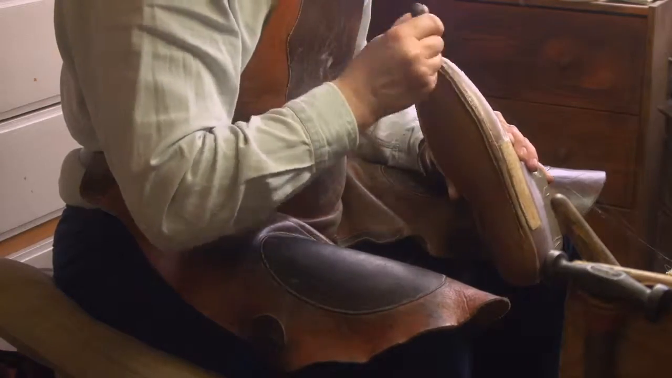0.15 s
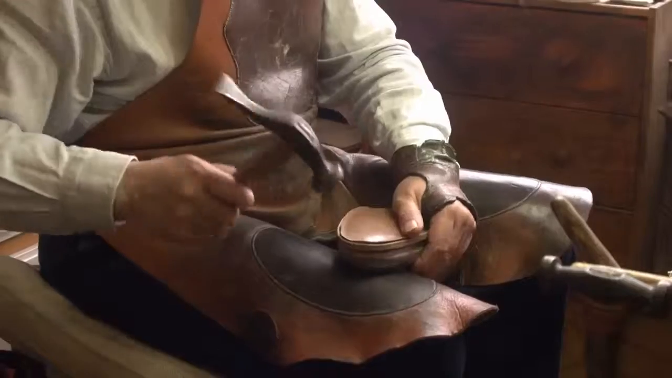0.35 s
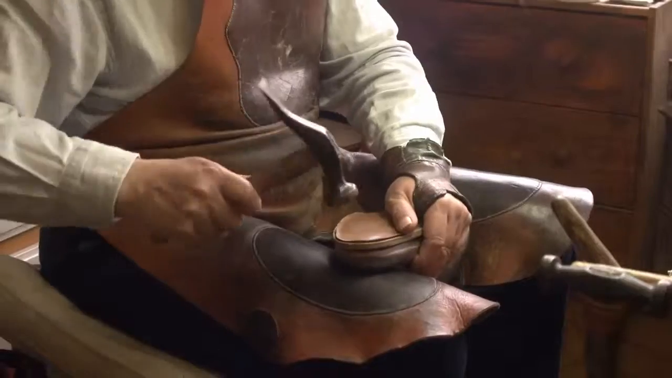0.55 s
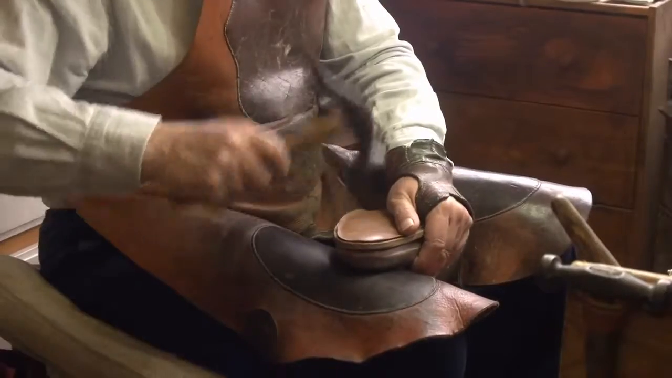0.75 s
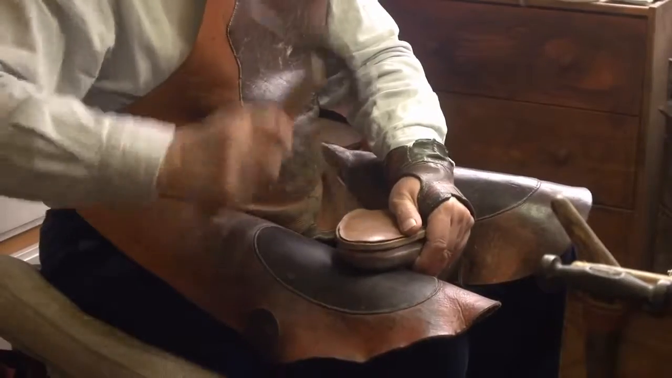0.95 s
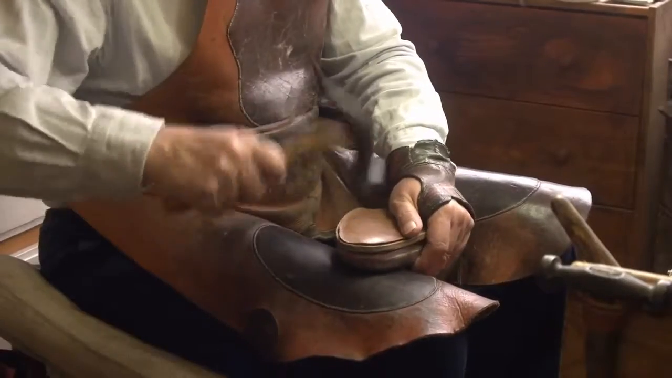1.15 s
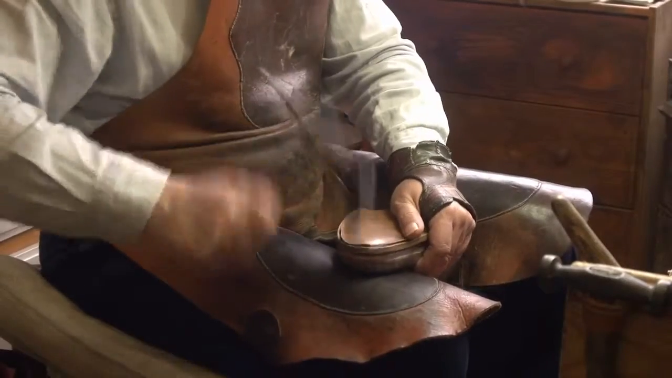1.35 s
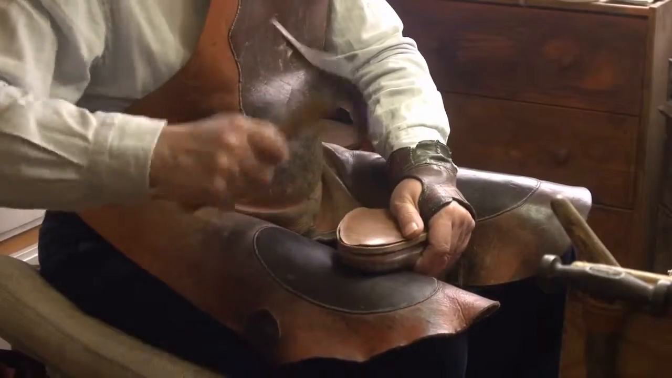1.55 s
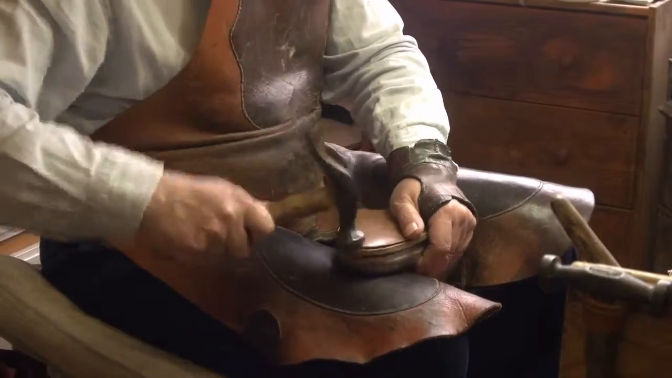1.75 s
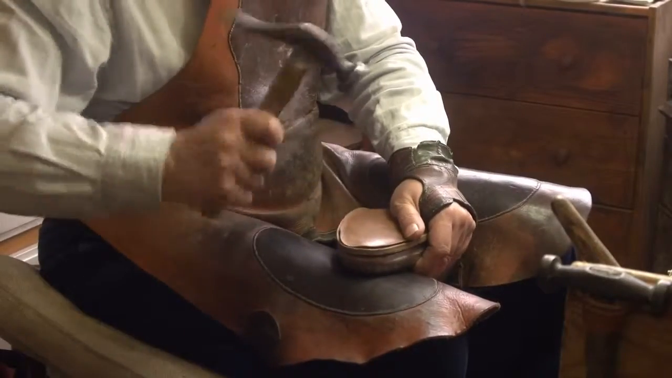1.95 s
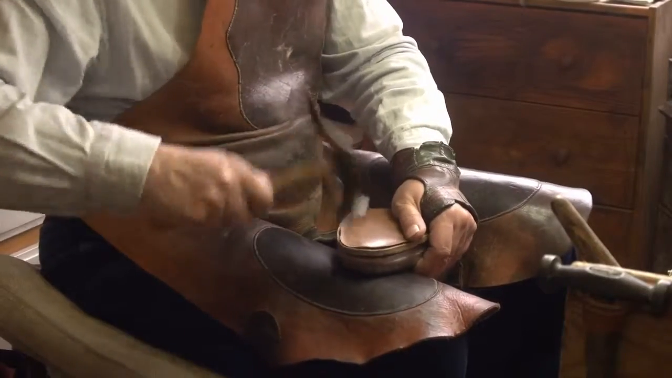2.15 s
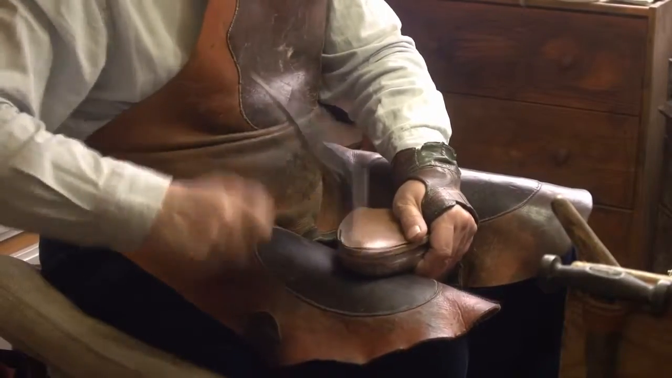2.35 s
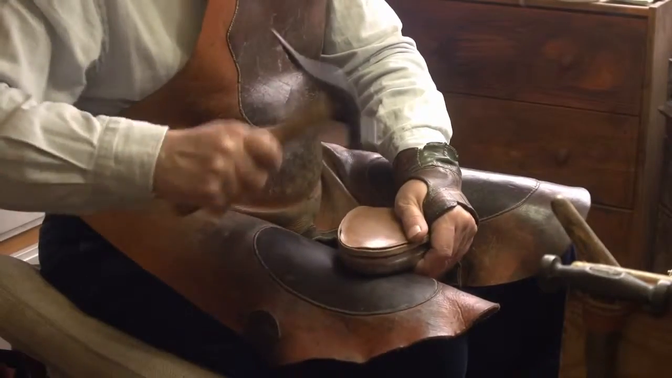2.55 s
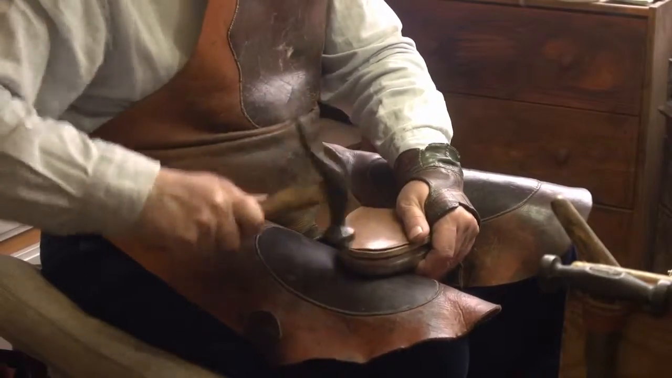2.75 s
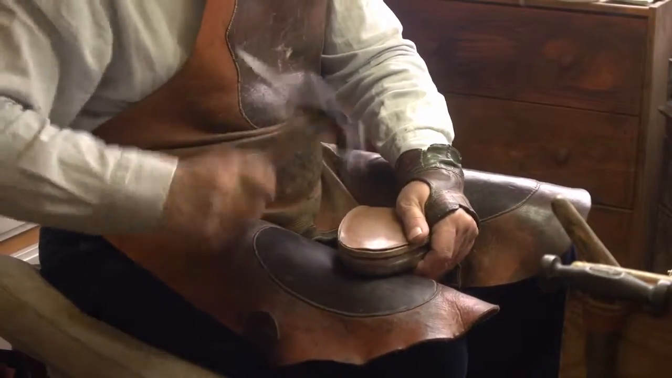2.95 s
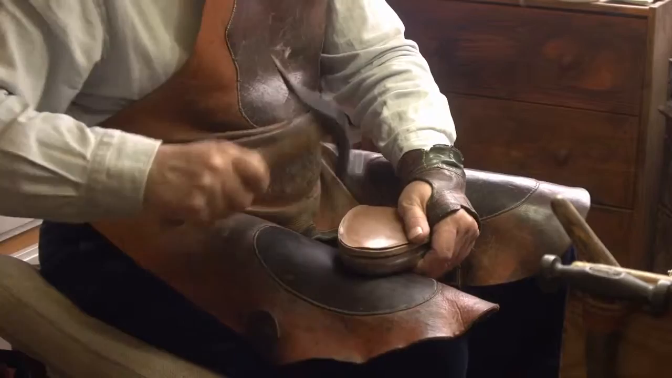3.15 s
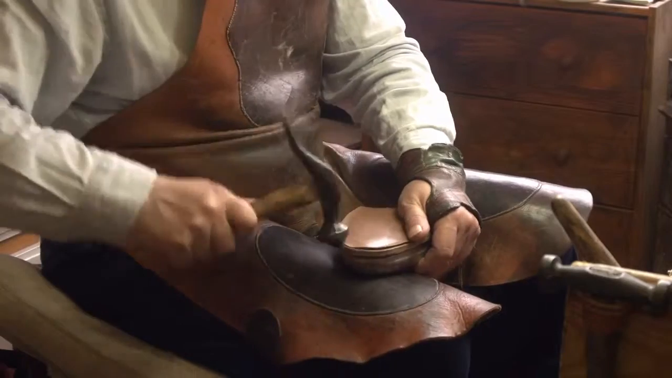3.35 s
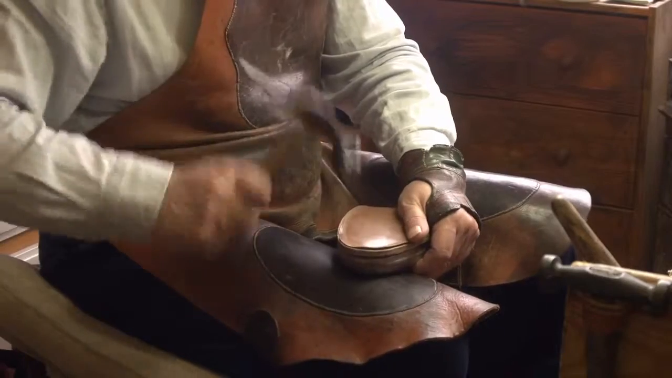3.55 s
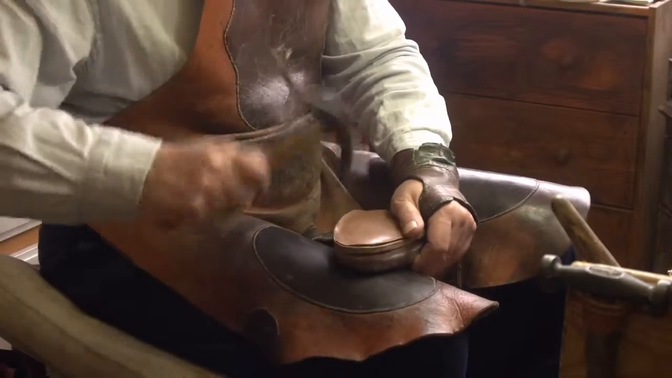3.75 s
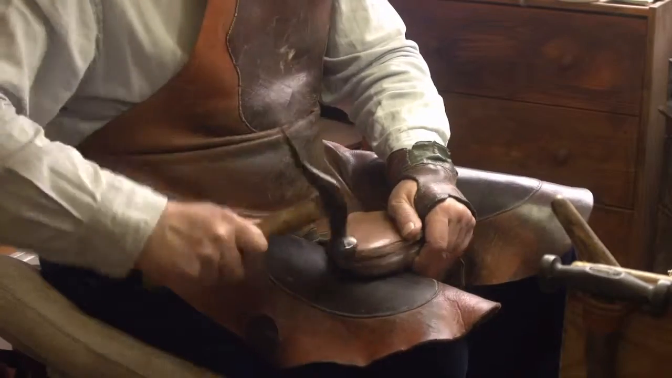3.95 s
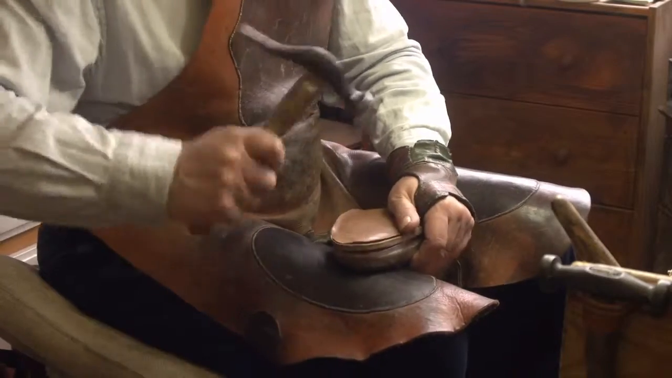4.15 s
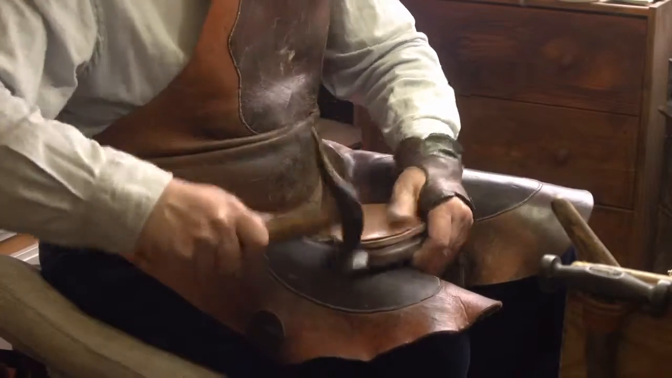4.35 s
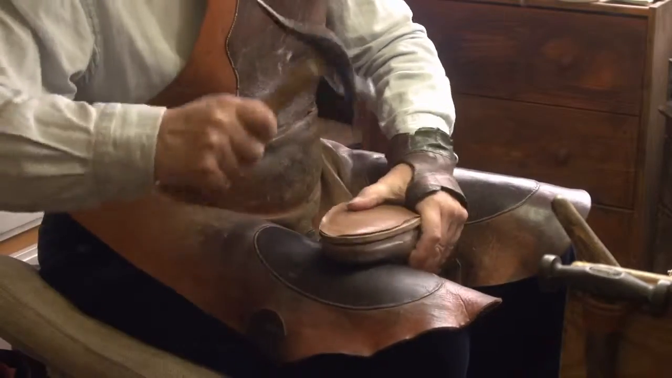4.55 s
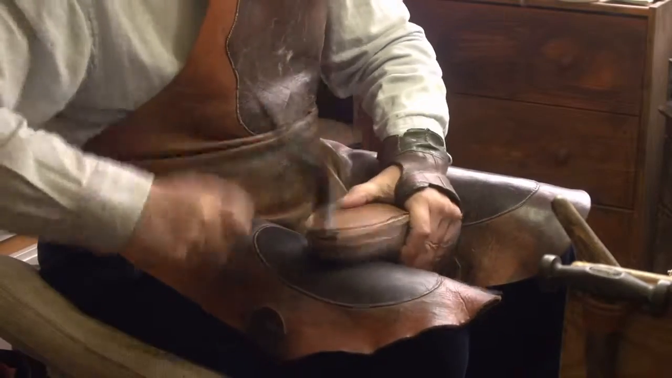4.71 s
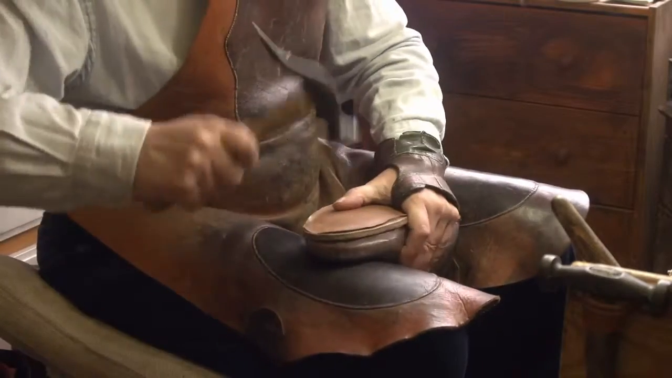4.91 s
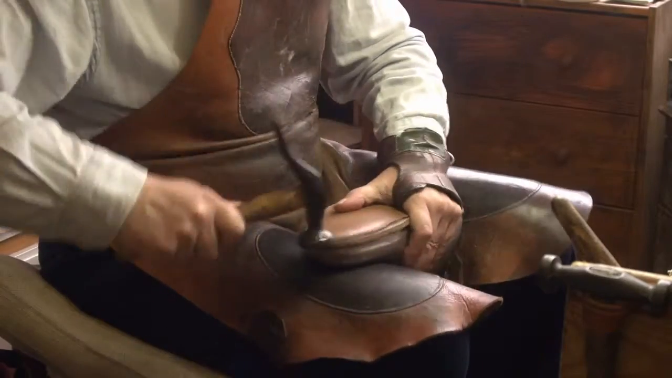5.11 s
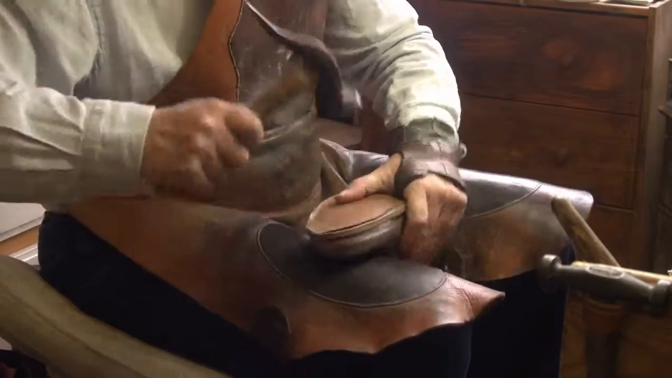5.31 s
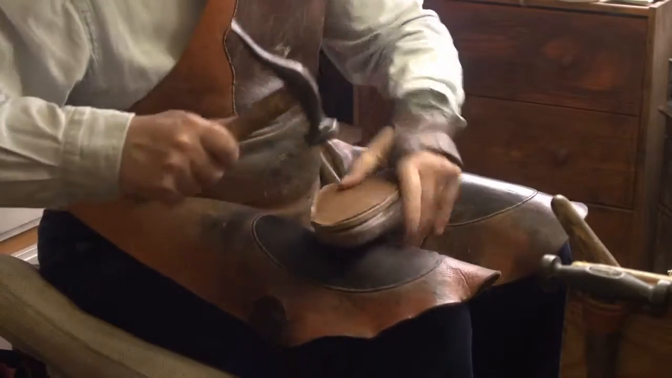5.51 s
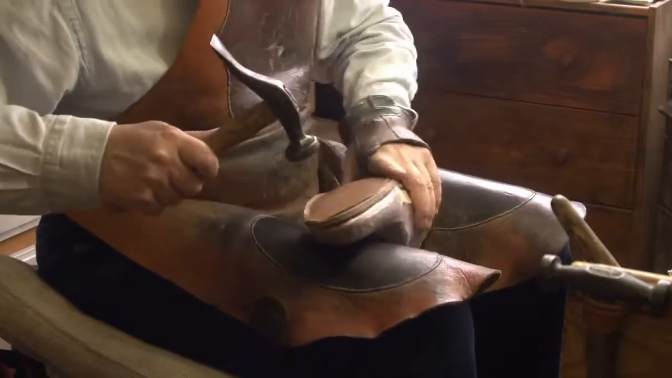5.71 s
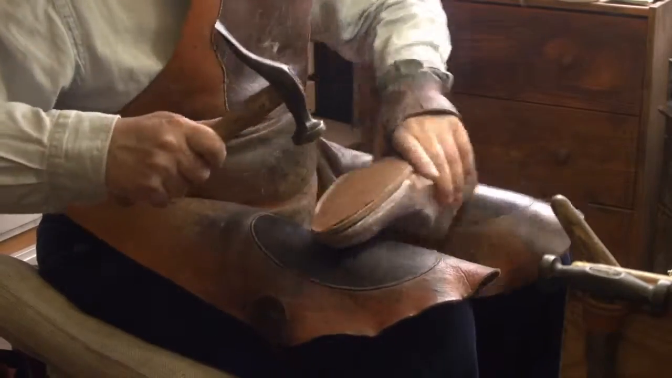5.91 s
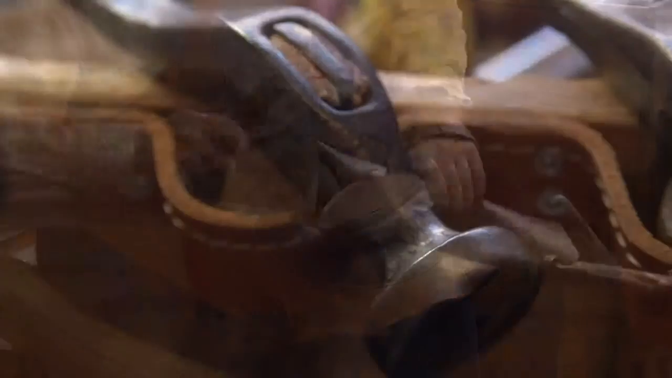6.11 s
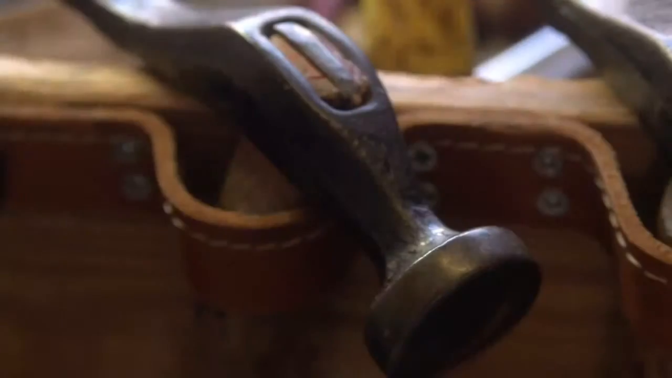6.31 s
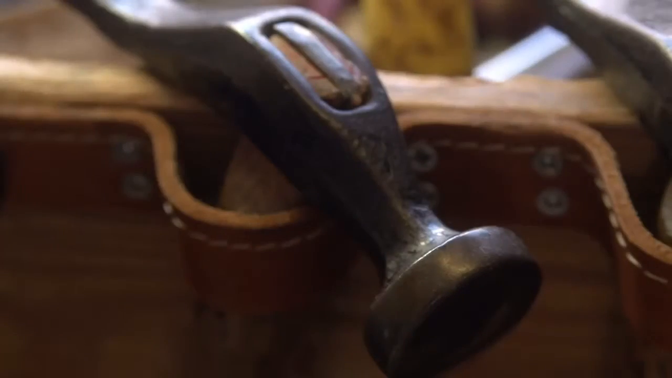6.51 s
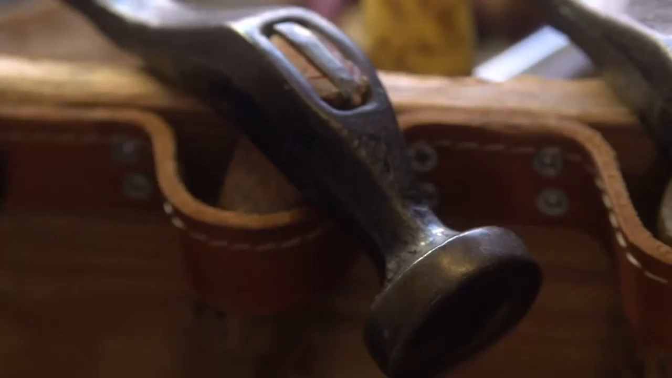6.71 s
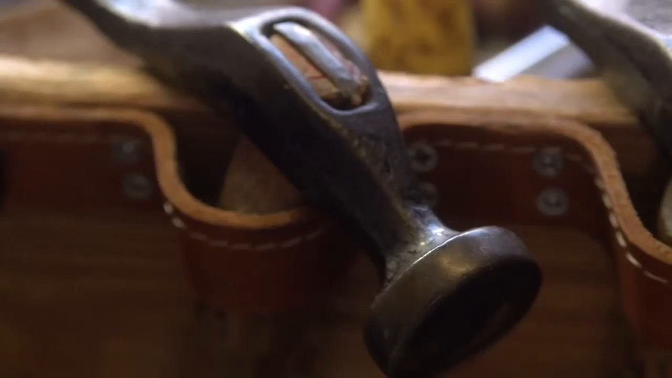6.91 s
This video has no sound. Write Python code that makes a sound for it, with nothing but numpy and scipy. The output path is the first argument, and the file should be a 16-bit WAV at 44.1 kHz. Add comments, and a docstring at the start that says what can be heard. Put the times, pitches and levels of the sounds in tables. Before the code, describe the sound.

Quiet room air and low mains hum lie under a small, live workshop. At 0.1-0.3 s a shoe bumps softly and scuffs on a leather apron, and a thin high whine swells faintly until about 1.4 s. From 1.06 s a steel hammer strikes the leather sole on its last, about three blows a second: sharp crack, hollow mid-pitched knock, low lap thud, short dense echo and a very faint metallic ring. Blows soften around 3.3-3.6 s, then strengthen until 4.3 s. A short rub, then a lighter blow at 4.77 and the hardest at 5.11. In the pause, 5.3-6.0 s, leather slides, creaks and squeaks briefly, with small bumps. Three duller, heavier blows follow at 6.3, 6.64 and 6.95 s, the last near the end. Close microphone, right channel only, left almost silent; loud peaks are squashed.

```python
"""Mains hum and room air lie under a small live workshop; a shoe bumps and scuffs on an apron, a thin whine swells.
From about one second a cobbler hammers a leather sole on a last in his lap, about three blows a second.
In a pause past five seconds he turns the shoe, which slides and squeaks on the leather; then the last blows fall.
Blows are noise cracks, ringing sines and wall echoes; rubbing is shaped noise, squeaks are unsteady sines.
One microphone feeds the right channel, with only faint crosstalk on the left; its input flattens the peaks."""
import sys
import numpy as np
from scipy import signal
from scipy.fft import rfft, irfft, next_fast_len
from scipy.io import wavfile
from scipy.ndimage import map_coordinates

SR = 44100
rng = np.random.default_rng(int(sys.argv[2]) if len(sys.argv) > 2 else 0)


def transcribe(signal):
    """Save signal, clipped to [-1, 1], as a 16-bit WAV file at the path in sys.argv[1]."""
    frames = np.atleast_2d(signal).T
    limited = np.clip(frames, -1, 1)
    pcm = np.round(limited * 32767).astype(np.int16)
    wavfile.write(sys.argv[1], SR, pcm)


N = 307377  # length in samples


def amp(db):
    """Decibels to gain."""
    return 10 ** (np.asarray(db) / 20)


def unit(x):
    """Scale to rms 1."""
    return x / np.sqrt(np.mean(x ** 2) + 1e-20)


def along(points, hz):
    """Interpolate (Hz, value) points on a log frequency axis."""
    point_hz, values = np.transpose(points)
    return np.interp(np.log(hz + 1), np.log(point_hz + 1), values)


def filtered(x, gain_at):
    """Filter x by a gain that depends on frequency, without phase shift."""
    size = next_fast_len(len(x) + SR // 10)  # spare room keeps the end from wrapping round
    hz = np.fft.rfftfreq(size, 1 / SR)
    return irfft(rfft(x, size) * gain_at(hz), size)[:len(x)]


def noise(spectrum, size):
    """Noise of rms 1 with the given colour and random phases."""
    hz = np.fft.rfftfreq(size, 1 / SR)
    phases = np.exp(2j * np.pi * rng.random(len(hz)))
    return unit(irfft(amp(along(spectrum, hz)) * phases, size))


def wobble(rate):
    """A smooth random curve through `rate` random knots a second."""
    knots = rng.standard_normal(int(N * rate / SR) + 4)
    return map_coordinates(knots, [np.arange(N) * rate / SR])


def sine(hz, t):
    """A sine at a random starting phase."""
    return np.sin(2 * np.pi * (hz * t + rng.random()))


# drop in dB one rise or fall time from the peak; roundness of the peak
SWELL_DB, SWELL_CURVE = 10, 1.87


def swells(rows, t):
    """Gain of motions that each gather, peak and come to rest; overlapping ones add in power."""
    power = np.zeros(len(t))
    for s, db, rise_s, fall_s in rows:
        away = np.maximum((s - t) / rise_s, (t - s) / fall_s)  # distance from the peak
        power += amp(db - SWELL_DB * np.abs(away) ** SWELL_CURVE) ** 2
    return np.sqrt(power)


# Colour of the room air. Each row: frequency in Hz, relative level in dB per Hz.
AIR_COLOUR = [(20, -12), (35, -4), (70, -11), (150, -13), (230, -13), (330, -17), (450, -17.5),
              (650, -22.5), (1100, -25), (1700, -30.5), (2200, -38), (2900, -39), (5000, -46),
              (16000, -52.5)]
# Tones of the mains hum. Each row: frequency in Hz, level in dB before the hum's own gain.
HUM_TONES = [(49.5, -54), (99.9, -82), (400, -71), (1480, -78)]
# Swells of the thin whine. Each row: loudest moment in seconds, peak in dB, rise in seconds, fall in seconds.
WHINE_SWELLS = [(.36, -62.5, 0.12, 0.22), (.98, -62, 0.1, .15), (1.33, -65, .1, .1)]


def background(air_db, hum_db, whine_hz):
    """Room air is steady coloured noise; hum is a set of steady sines; the whine is one sine that swells."""
    t = np.arange(N) / SR
    hum = sum(amp(db + hum_db) * sine(hz, t) for hz, db in HUM_TONES)
    whine = swells(WHINE_SWELLS, t) * sine(whine_hz, t)
    air = amp(air_db) * noise(AIR_COLOUR, size=N)
    return hum + whine + air


# Hands and shoe bump and scuff on the apron.
# Each row: start in seconds, level in dB, centre frequency in Hz, time to fall 60 dB in seconds.
APRON_CONTACTS = [(0.124, -39, 95, 0.39), (0.193, -37, 90, 0.11), (.23, -52, 1730, 0.42),
                  (.805, -60, 5000, .12), (5.59, -41, 780, 0.19), (5.705, -41, 1280, 0.1),
                  (5.752, -46.5, 1500, 0.21), (6.014, -37, 75, 0.19)]


def handling(rise_s):
    """Soft contacts: puffs of noise around one pitch that start quickly and die away."""
    t = np.arange(SR // 2) / SR
    out = np.zeros(N + SR)
    for s, db, hz, t60 in APRON_CONTACTS:
        colour = [(hz / 8, -40), (hz / 2, -6), (hz, 0), (hz * 2, -12), (hz * 10, -60), (hz * 100, -120)]
        envelope = amp(db - 60 * t / t60) * (1 - np.exp(-t / rise_s))
        out[round(s * SR):][:len(t)] += envelope * noise(colour, size=len(t))
    return out[:N]


# Colour of leather rubbing on leather. Each row: frequency in Hz, relative level in dB per Hz.
RUB_COLOUR = [(100, -17), (250, -5), (500, -9), (830, -1), (1250, -9.5), (1550, -5), (2200, -6.5),
              (3000, -6), (4600, -10), (7500, -18), (12000, -23), (16000, -35)]
# Strokes of the shoe sliding on the apron.
# Each row: fastest moment in seconds, peak level in dB, rise in seconds, fall in seconds.
SLIDE_STROKES = [(.245, -60, .02, 0.068), (4.42, -43.5, .06, 0.053), (4.65, -49, 0.23, 0.11),
                 (5.35, -46.5, 0.065, 0.043), (5.53, -37, 0.14, 0.11), (5.73, -48, 0.076, 0.05),
                 (5.98, -40, 0.11, 0.13)]


def sliding(grip_db, grain_db):
    """Leather rubs on leather: noise whose level flutters slowly with the grip and quickly with the grain."""
    flutter = amp(grip_db * wobble(rate=45) + grain_db * wobble(rate=500))
    friction = unit(noise(RUB_COLOUR, size=N) * flutter)
    return swells(SLIDE_STROKES, np.arange(N) / SR) * friction


# Short squeaks as the shoe turns. Each row: loudest moment in seconds, peak in dB, mean pitch in Hz.
LEATHER_SQUEAKS = [(5.335, -44, 2440), (5.357, -42, 2640), (5.372, -37, 872), (5.398, -37.5, 1506),
                   (5.455, -44.5, 810), (5.465, -44, 2980), (5.615, -46, 810)]
SQUEAK_RISE_S, SQUEAK_FALL_S = 0.031, 0.029


def squeaking(flutter, flutter_rate):
    """The leather sticks and slips: sines whose pitches waver together at random."""
    t = np.arange(N) / SR
    phase = 2 * np.pi * np.cumsum(1 + flutter * wobble(flutter_rate)) / SR  # of a 1 Hz tone
    out = np.zeros(N)
    for s, db, hz in LEATHER_SQUEAKS:
        out += swells([(s, db, SQUEAK_RISE_S, SQUEAK_FALL_S)], t) * np.sin(hz * phase)
    return out


def hammer_ring(hz, level_db, t60, grip_damping):
    """The steel head sings on faintly; harder blows damp it, a snappier landing lifts it."""
    t = np.arange(SR) / SR
    out = np.zeros(N + 2 * SR)
    for s, force_db, _, snap_db in HAMMER_BLOWS:
        ring_db = level_db + snap_db / 2 - grip_damping * force_db
        out[round(s * SR):][:len(t)] += amp(ring_db - 60 * t / t60) * sine(hz, t)
    return out[:N]


def thud(t, level_db, hz, t60):
    """The shoe sinks into the lap and springs back: a low decaying sine that starts downwards."""
    return -amp(level_db - 60 * t / t60) * np.sin(2 * np.pi * hz * t)


# Decay of the workshop. Each row: frequency in Hz, time to fall 60 dB in seconds.
ROOM_DECAY = [(60, 0.32), (160, 0.37), (420, 0.29), (1100, 0.36), (2900, 0.35), (7700, 0.29), (15000, 0.19)]


def diffuse(t, spectrum):
    """Dense wall echoes: noise in which each frequency dies at its own speed."""
    hz, age, bins = signal.stft(noise(spectrum, size=len(t)), SR, nperseg=256)
    decay = amp(-60 * age / along(ROOM_DECAY, hz)[:, None])
    return signal.istft(bins * decay, SR)[1][:len(t)]


# Steel on leather. Each row: frequency in Hz, relative level in dB per Hz.
CRACK_COLOUR = [(30, -6.5), (100, -4.5), (400, 2.5), (1000, -8), (2500, -4), (5000, -13.5), (10000, -22),
                (16000, -31.5)]
# Its echo from the walls. Each row: frequency in Hz, relative level in dB per Hz.
ECHO_COLOUR = [(30, -5.5), (80, -19), (160, -2), (270, -7.5), (400, 4.5), (750, 0.5), (1100, -4),
               (1800, -8.5), (2800, -13), (4000, -19.5), (6500, -27), (10000, -31), (16000, -44)]
# Ringing of the shoe on its last. Each row: frequency in Hz, relative level in dB, time to fall 60 dB in seconds.
SHOE_MODES = [(99, 1, 0.058), (314.8, -9, 0.23), (393.2, 2, 0.15), (562.7, 4, 0.12), (662, 5.5, 0.11),
              (776.8, 7, 0.075), (909, -7.5, 0.15), (1210, -28, .12), (1532, -15.5, 0.36),
              (1890, -7.5, 0.034), (2806, -7.5, 0.071)]
# Standing waves of the workshop. Each row: frequency in Hz, relative level in dB.
ROOM_MODES = [(82, -10), (152, -8), (201, -8), (246, -7.5), (360, -2), (420, 6), (440, -6), (503, -1.5),
              (524, -1), (590, -3.5), (679, 2.5), (767, -6), (800, 0.5), (916, -13), (1073, -15),
              (1314, -10.5), (1528, -14.5), (1728, -13), (1878, -11), (1959, -16.5), (1985, -20.5),
              (2313, -16), (2656, -13.5)]


def response(t, crack_db, crack_t60, shoe_db, standing_db, echo_db, build_s):
    """One blow at one spot: contact crack, knock of the shoe, then the room builds up and rings."""
    crack = noise(CRACK_COLOUR, size=len(t)) * amp(crack_db - 60 * t / crack_t60)
    knock = sum(amp(shoe_db + db - 60 * t / t60) * sine(hz, t) for hz, db, t60 in SHOE_MODES)
    standing = sum(amp(standing_db + db - 60 * t / along(ROOM_DECAY, hz)) * sine(hz, t)
                   for hz, db in ROOM_MODES)
    echo = amp(echo_db) * diffuse(t, ECHO_COLOUR)
    room = (standing + echo) * (1 - np.exp(-t / build_s))
    return (crack + knock + room) * (1 - np.exp(-t / 0.0013))  # soft onset, time constant in s


# How the shoe sits in the lap: flat, tilted, pressed down again.
# Each row: from this time in seconds, thump in dB, knock in dB.
LAP_SEATS = [(0, 1.5, 1), (4.5, 0.5, -2.5), (6, 3.5, -.5)]
# dB by which each falls behind per dB of force: harder blows are brighter
THUMP_LAG, KNOCK_LAG = 0.59, 0.6


def voiced(blow, s, force_db, slap_db, snap_db):
    """The seat sets the lows, force thins them, and how squarely the face lands sets slap and snap."""
    _, thump_db, knock_db = [seat for seat in LAP_SEATS if seat[0] < s][-1]
    thump = thump_db - THUMP_LAG * force_db
    knock = knock_db - KNOCK_LAG * force_db
    tone = [(200, thump), (410, knock), (750, 0), (1700, slap_db), (6000, snap_db)]  # (Hz, dB)
    return filtered(blow, lambda hz: amp(along(tone, hz)))


# Hammer blows, also heard in the ring of the head.
# Each row: start in seconds, force in dB over an average blow, slap in dB, snap in dB.
HAMMER_BLOWS = [(1.0575, -1, 2.3, -3), (1.4144, -1, 4, -0.5), (1.7535, 1.5, 3, 2.5), (2.0793, 2.5, 2, -1.3),
                (2.4122, 1.5, 2.5, -1.7), (2.7328, .5, 1, -6.5), (3.0319, -1.5, 0.5, -6),
                (3.337, -3.5, -0.5, -2), (3.6355, -4, -0.5, -3), (3.9709, 1.5, 2.8, 1.5),
                (4.2729, 0.5, 3.5, -4), (4.7686, -2.5, 4, -3.5), (5.1108, 4.5, 2.2, -1.5),
                (6.2966, 1, -1, -4.5), (6.6363, 3, -1.5, -7.5), (6.948, 0, -0.5, -5.5)]
BLOW_DB = -2  # gain of a blow of average force
WANDER = 0.2  # share of the response's power that is new at each landing spot (0-1)


def hammering():
    """Blows share one response, which changes a little as the hammer wanders over the sole."""
    t = np.arange(SR // 2) / SR

    def spot():
        """A fresh landing spot: same levels, new phases and noise."""
        return response(t, crack_db=10.5, crack_t60=0.021, shoe_db=-7.5, standing_db=-16.5,
                        echo_db=-4.5, build_s=0.0016)

    usual = spot()
    lap = thud(t, level_db=-12, hz=52, t60=0.084)
    out = np.zeros(N + SR)
    for s, force_db, slap_db, snap_db in HAMMER_BLOWS:
        blow = np.sqrt(1 - WANDER) * usual + np.sqrt(WANDER) * spot()
        strike = lap + voiced(blow, s, force_db, slap_db, snap_db)
        out[round(s * SR):][:len(t)] += amp(BLOW_DB + force_db) * strike
    return out[:N]


def scene():
    """The microphone feeds the right channel; the left has only faint crosstalk and hiss."""
    room = background(air_db=-49.0, hum_db=8.0, whine_hz=2310)
    hands = handling(rise_s=0.0027) + sliding(grip_db=1.4, grain_db=1.4)
    hands += squeaking(flutter=0.055, flutter_rate=870)
    blows = hammer_ring(hz=6400, level_db=-61, t60=1.8, grip_damping=1.3) + hammering()
    mic = room + hands + blows
    left = amp(-82.5) * mic + amp(-98.5) * rng.standard_normal(N)
    return np.array([left, mic])


TOP_HZ = 16200  # band limit


def record(dry):
    """The input stage flattens peaks towards a ceiling; a steep low-pass then sets the band limit."""
    ceiling, hardness = 0.6, 7  # full scale is 1; a higher hardness bends more sharply
    clipped = dry / (1 + np.abs(dry / ceiling) ** hardness) ** (1 / hardness)

    def low_pass(hz):
        """Gain that falls very steeply past the band limit."""
        return 1 / (1 + (hz / TOP_HZ) ** 100)

    return np.array([filtered(channel, low_pass) for channel in clipped])


dry = scene()
out = record(dry)
transcribe(out)
```